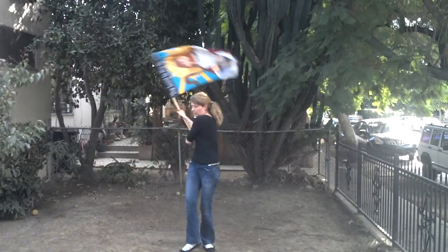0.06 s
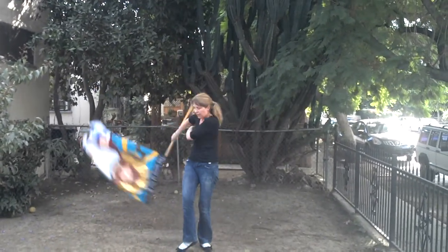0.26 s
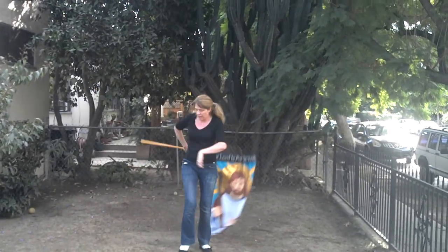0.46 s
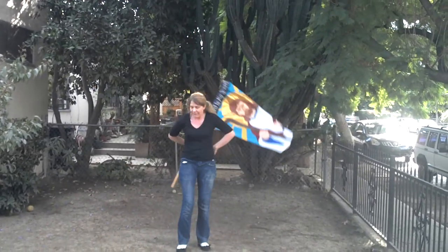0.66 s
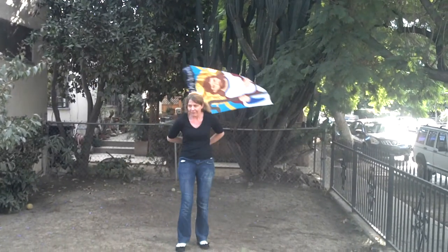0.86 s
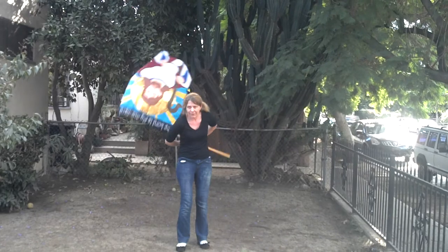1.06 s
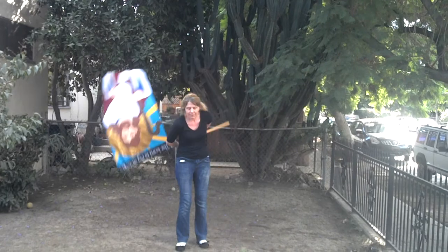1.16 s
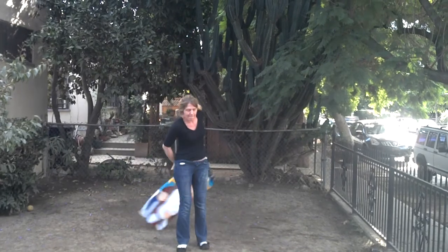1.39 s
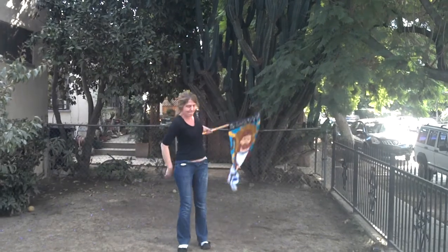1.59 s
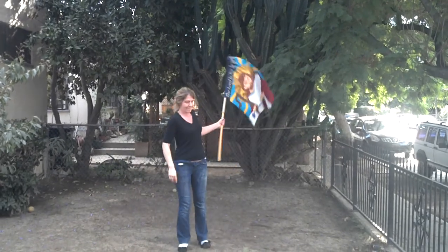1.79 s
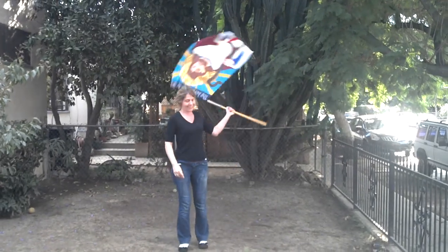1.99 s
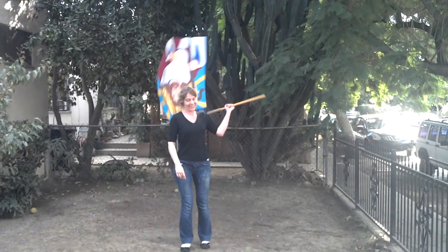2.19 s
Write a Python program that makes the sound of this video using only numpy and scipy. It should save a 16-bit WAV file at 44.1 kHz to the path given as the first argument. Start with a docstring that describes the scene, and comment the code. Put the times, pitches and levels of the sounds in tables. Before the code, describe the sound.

Big fabric flag twirled in a yard, one loud flapping burst, then a weaker one, sparse bird chirps

```python
"""Far traffic, shaped noise, rumbles throughout a yard; gliding whistles make sparrow-like birds chirp here and there.
Someone twirls a large cloth flag on a pole: first the air (fluttering noise) rushes and the cloth (tiny grains)
rustles, then about a third of a second in the sheet flaps, knocks and snaps hard (pushes through resonances).
After a quieter stretch a weaker bout of flaps and snaps comes near 1.4 s, then a flurry of chirps near 2.1 s.
A small camera hears all this with two capsules and widens the stereo with a short delay comb."""
import sys
import numpy as np
from scipy import signal
from scipy.fft import rfft, irfft, next_fast_len
from scipy.io import wavfile

SR = 44100
rng = np.random.default_rng(int(sys.argv[2]) if len(sys.argv) > 2 else 0)


def generate_wav(sig):
    """Save sig (samples, or channels by samples) to the path in sys.argv[1] as 16-bit PCM at SR."""
    pcm = np.round(np.clip(np.atleast_2d(sig).T, -1, 1) * 32767).astype(np.int16)
    wavfile.write(sys.argv[1], SR, pcm)


def magnitude_from_level(level_db):
    """Linear magnitude for a level in decibels (20 dB per decade)."""
    exponent = np.asarray(level_db, float) / 20
    return 10 ** exponent


N = 99225  # length in samples: 2.25 s


def rms_one(x):
    """Scale to unit rms."""
    return x / np.sqrt(np.mean(x ** 2) + 1e-20)


def in_time(rows):
    """Draw straight lines between (time [s], value) points, giving a value at every sample."""
    return np.interp(np.arange(N) / SR, *np.transpose(rows))


def through(x, response):
    """Filter by a response given as a function of Hz."""
    size = next_fast_len(N + 4096)
    hz = np.arange(size // 2 + 1) * SR / size + 1e-3
    return irfft(rfft(x, size) * response(hz), size)[..., :N]


def on_log(points):
    """Turn a (frequency [Hz], value) table into a function of Hz, with straight lines over log frequency."""
    table_hz, values = np.transpose(points)
    return lambda hz: np.interp(np.log(hz), np.log(table_hz), values)


def colour(x, spectrum):
    """Shape the spectrum by a (frequency [Hz], level [dB]) table."""
    return through(x, lambda hz: magnitude_from_level(on_log(spectrum)(hz)))


def drift(rate_hz):
    """Wander by chance at up to about rate_hz, with unit rms: white noise smoothed by two equal poles."""
    pole = np.exp(-2 * np.pi * rate_hz / SR)
    smooth = signal.lfilter([1], [1, -2 * pole, pole * pole], rng.standard_normal(N + SR))
    return rms_one(smooth[SR:])  # skip the first second, where the filter settles


def bursts(rows, width, rough):
    """Send a push and dying turbulence through a resonance, scaled to its peak; one draw per capsule.

    width is the band's reach over its centre; rough is the strength of the turbulence after the push."""
    out = np.zeros((2, N + SR))
    t = np.arange(SR // 8) / SR
    for start, db, hz, t60 in rows:
        turbulence = rng.standard_normal((2, len(t))) * magnitude_from_level(-60 * t / t60)
        drive = rough * np.sqrt(hz / SR) * 4 * turbulence
        drive[:, 0] += 1  # the push
        edges = [hz / (1 + width), min(hz * (1 + width), .45 * SR)]
        sound = signal.sosfilt(signal.butter(2, edges, "band", fs=SR, output="sos"), drive)
        i = int(start * SR)
        out[:, i:i + len(t)] += magnitude_from_level(db) * sound / abs(sound).max(axis=1, keepdims=True)
    return out[:, :N]


# colour of the far street: (frequency [Hz], relative level [dB])
TRAFFIC_SPECTRUM = [(40, -42), (60, -5), (90, -3), (130, 3), (300, 2.5), (450, -1), (900, -2.5),
                    (1300, -17.5), (2000, -41), (3000, -32), (5500, -46), (7000, -29), (10000, -39),
                    (12000, -32), (15000, -37)]


def traffic():
    """A steady far rumble: shaped noise that swells a little, both slowly and faster."""
    level_db, swell_db = -49.5, 3
    swell = swell_db * (drift(0.88) + 0.42 * drift(22.0))
    rumble = rms_one(colour(rng.standard_normal((2, N)), TRAFFIC_SPECTRUM))
    return rumble * magnitude_from_level(level_db + swell)


# bird notes, before rasp and echo: (start time [s], length [s], level [dB], from [Hz], to [Hz])
BIRD_NOTES = [(0.106, 0.025, -55.5, 5020, 4160), (0.111, 0.031, -60, 4070, 3890),
              (0.594, 0.13, -70, 4000, 3940), (0.753, 0.03, -57, 3790, 3550),
              (0.806, 0.017, -55, 3560, 3690), (1.484, 0.024, -57.5, 3355, 3670),
              (2.103, 0.019, -60.5, 4370, 4400), (2.122, 0.031, -54.5, 4700, 3925),
              (2.151, 0.0252, -58.5, 4610, 3940), (2.166, 0.047, -60.5, 3270, 4000),
              (2.18, 0.033, -59, 4540, 4050), (2.193, 0.012, -55, 3990, 4030),
              (2.196, 0.037, -60, 3560, 3440)]


def birds():
    """Gliding whistles, wavering in pitch and rasping in level, with a short scattered echo off the trees."""
    waver_share, rasp_db = .013, 5
    echo_t60_s, echo_db = 0.34, -3
    notes = np.zeros(N + SR)
    waver = 1 + waver_share * drift(174.0)
    for start, length, db, from_hz, to_hz in BIRD_NOTES:
        u = np.linspace(0, 1, int(length * SR))  # progress through the note
        i = int(start * SR)
        hz = (from_hz + (to_hz - from_hz) * u) * np.resize(waver[i:], len(u))
        swell = np.sqrt(2 * np.sin(np.pi * u) + 1e-9)
        notes[i:i + len(u)] += magnitude_from_level(db) * swell * np.sin(2 * np.pi * np.cumsum(hz) / SR)
    notes = notes[:N] * magnitude_from_level(rasp_db * drift(240.0))
    t = np.arange(SR // 4) / SR
    scatter = rng.standard_normal((2, len(t))) * magnitude_from_level(-60 * t / echo_t60_s)
    echo = magnitude_from_level(echo_db) * rms_one(scatter) / np.sqrt(len(t))
    return notes + signal.fftconvolve(notes[None], echo, axes=1)[:, :N]


# strength of the air rush, before its flutter: (time [s], level [dB])
RUSH_LEVEL = [(0, -39.5), (.05, -46.5), (.15, -51), (.2, -42.5), (.25, -35.5), (.28, -41), (.32, -33.5),
              (.35, -28), (.39, -33.5), (.425, -38), (.452, -28), (.47, -39.5), (.495, -30), (.52, -33.5),
              (.55, -34.5), (.585, -45), (.72, -46), (.85, -50.5), (1.33, -50), (1.4, -44.5),
              (1.438, -38.5), (1.465, -45), (1.51, -42.5), (1.55, -51), (1.62, -47), (1.8, -49),
              (2.25, -51)]
# colour of the air rush: (frequency [Hz], relative level [dB])
RUSH_SPECTRUM = [(50, -44), (90, -10), (160, -4), (300, 1.5), (450, -6), (700, -0.5), (1200, -3.5),
                 (2000, -7.5), (2400, -13.5), (3200, -22.5), (6000, -47)]


def air_rush():
    """Air rushing over the cloth: shaped noise following the twirl, with a fast random flutter in level."""
    flutter_db, flutter_hz = 1.5, 110
    rush = rms_one(colour(rng.standard_normal((2, N)), RUSH_SPECTRUM))
    return rush * magnitude_from_level(in_time(RUSH_LEVEL) + flutter_db * drift(flutter_hz))


# strength of the rubbing and crinkling, before its patchiness: (time [s], level [dB])
RUSTLE_LEVEL = [(0.0, -49.5), (0.04, -59.5), (0.17, -56.5), (0.19, -43.5), (0.21, -52.5), (0.27, -40.5),
                (0.31, -49), (0.33, -36.5), (0.34, -41), (0.43, -46.5), (0.44, -44.5), (0.497, -45.5),
                (0.499, -38), (0.53, -36), (0.64, -56), (0.81, -52), (0.92, -61.5), (1.27, -62.5),
                (1.42, -55.5), (1.45, -51), (1.512, -55), (1.516, -48), (1.61, -59.5), (1.72, -62),
                (1.72, -53), (1.77, -57), (1.9, -63.5), (2.25, -62.5)]
# colour of the crinkle grains: (frequency [Hz], relative level [dB])
CRINKLE_SPECTRUM = [(1500, 4), (3000, 5.5), (4500, 3.5), (7000, 1.5), (8500, -0.5), (10000, -9.5),
                    (11500, -20.5), (15000, -24)]


def cloth_rustle():
    """Cloth rubbing and crinkling: a dense rain of tiny clicks of random sign and size, coloured."""
    grains_per_s, grain_spread_db, patchy_db = 5000, 2.5, 0.5
    grains = (rng.random((2, N)) < grains_per_s / SR) * rng.choice([-1, 1], (2, N))
    grains = grains * magnitude_from_level(grain_spread_db * np.minimum(rng.exponential(1, (2, N)), 5))
    rustle = rms_one(colour(grains, CRINKLE_SPECTRUM))
    return rustle * magnitude_from_level(in_time(RUSTLE_LEVEL) + patchy_db * drift(68.0))


# flaps, peak before the treble cut:
# (time [s], peak level [dB], centre [Hz], time for the wobble's turbulence to fall 60 dB [s])
SHEET_FLAPS = [(.179, -29.5, 690, 0.032), (.189, -31.5, 720, 0.19), (.257, -26, 567, 0.036),
               (.296, -21.5, 900, 0.04), (.3305, -15.5, 1110, 0.012), (.3275, -15, 720, 0.084),
               (.432, -21.5, 1010, 0.082), (.4415, -15, 1200, 0.057), (.4773, -8, 656, 0.0032),
               (.485, -34, 890, 0.014), (.498, -23, 1100, 0.033), (.5115, -19.5, 1020, 0.016),
               (1.370, -31.5, 640, 0.015), (1.407, -27, 920, 0.0087), (1.43, -29.5, 1000, 0.15),
               (1.4445, -20.5, 1060, 0.013), (1.502, -31.5, 1050, 0.021), (1.559, -24.5, 1110, 0.018),
               (1.729, -28.5, 900, 0.013)]


def sheet_flaps():
    """The sheet flaps: a push of air that wobbles on, in a wide band."""
    top_hz = 2400  # cloth is too soft for more treble
    soften = signal.butter(4, top_hz, fs=SR, output="sos")
    return signal.sosfilt(soften, bursts(SHEET_FLAPS, width=1, rough=0.54))


# knocks: (time [s], peak level [dB], pitch [Hz], time for the turbulence to fall 60 dB [s])
BELLY_THUMPS = [(.3295, -15, 670, 0.068), (.336, -14, 976, 0.025), (.4415, -18.5, 1750, 0.078),
                (.442, -20.5, 954, 0.049), (.4775, -22, 376, 0.052), (.499, -25.5, 367, 0.015),
                (.509, -20, 333, 0.017), (.5125, -20, 820, 0.046), (1.370, -36.5, 351, 0.015),
                (1.445, -28.5, 395, 0.015), (1.559, -28.5, 353, 0.055)]


def belly_thumps():
    """A hollow belly of the sheet pulls taut and knocks at its own pitch: a narrow resonance, mostly push."""
    return bursts(BELLY_THUMPS, width=.14, rough=0.15)


# cracks of the hem: (time [s], peak level [dB], centre [Hz], time for the turbulence to fall 60 dB [s])
HEM_SNAPS = [(.094, -44, 5400, .03), (.187, -32.5, 6400, 0.034), (.329, -36, 4750, 0.048),
             (.386, -37, 7360, .04), (.432, -33, 6900, 0.065), (.445, -25, 6770, 0.073),
             (.463, -33, 6000, 0.0087), (.4985, -28.5, 6760, 0.013), (.4985, -37, 4270, 0.017),
             (.4985, -37, 9100, .01), (.511, -44, 4150, .015), (.518, -28, 6500, 0.011),
             (1.16, -51, 5930, 0.032), (1.370, -39, 4450, 0.03), (1.430, -37, 6240, 0.027),
             (1.446, -35, 5600, 0.021), (1.5155, -47, 6600, 0.011), (1.528, -41, 8900, 0.0092),
             (1.721, -42, 6000, 0.11), (2.089, -48, 4000, 0.02)]


def hem_snaps():
    """The hem cracks: a push with strong dying turbulence in a high band."""
    return bursts(HEM_SNAPS, width=.24, rough=0.98)


def flag():
    """The whole flag: moving air, rubbing cloth, and the sheet and hem being jerked."""
    return air_rush() + cloth_rustle() + sheet_flaps() + belly_thumps() + hem_snaps()


# how alike the two capsules hear: (frequency [Hz], likeness [0-1])
CAPSULE_LIKENESS = [(100, 0.29), (400, 0.21), (700, 0.7), (1100, 0.51), (2000, 0.32), (4000, 0.42),
                    (7500, 0.87), (10000, 0.71)]
# phase of the second capsule against the first: (frequency [Hz], phase [radians])
CAPSULE_PHASE = [(1200, 0), (1500, -8.5), (2400, 0.3), (2900, -0.07)]


def capsules(pair, second_spectrum):
    """The second capsule hears a partly unlike, recoloured version of what the first hears."""
    def alike(hz):
        return np.clip(on_log(CAPSULE_LIKENESS)(hz), 0, 1)

    shared = through(pair[0], lambda hz: alike(hz) * np.exp(1j * on_log(CAPSULE_PHASE)(hz)))
    separate = through(pair[1], lambda hz: np.sqrt(1 - alike(hz) ** 2))
    return np.array([pair[0], colour(shared + separate, second_spectrum)])


# second capsule against the first, for the far street: (frequency [Hz], level [dB])
SECOND_CAPSULE_FAR = [(60, 9), (130, -2), (300, -6.5), (450, 0.5), (900, -1), (1200, 17.5), (2300, 4),
                      (8000, -7), (11500, -3), (15000, 2)]
# second capsule against the first, for the flag and birds: (frequency [Hz], level [dB])
SECOND_CAPSULE_NEAR = [(60, -3), (130, -8), (300, -16), (650, -12), (1200, -5), (1600, -3), (2300, -6),
                       (3000, 1), (15000, 0)]


def scene():
    """What the two capsules pick up: the far street, then the birds and flag."""
    far = capsules(traffic(), SECOND_CAPSULE_FAR)
    near = capsules(birds() + flag(), SECOND_CAPSULE_NEAR)
    return far + near


def band_limit(x):
    """A steep low-pass at the top of the band."""
    return signal.sosfilt(signal.butter(12, 15670, fs=SR, output="sos"), x)


def record(dry):
    """Mid is the first capsule minus its delayed self, bass restored; side is the second plus its delayed self."""
    comb_samples, bass_lift_hz = 16.945, 826
    low_cut_hz, top_hz = 85.5, 15100

    def late(hz):
        return np.exp(-2j * np.pi * hz * comb_samples / SR)

    mid = through(dry[0], lambda hz: (1 - late(hz)) / 2 * (1 + bass_lift_hz / (1j * hz)))
    side = through(dry[1], lambda hz: -(1 + late(hz)) / 2)
    low_cut = signal.butter(3, low_cut_hz, "high", fs=SR, output="sos")
    stereo = signal.sosfilt(low_cut, [mid + side, mid - side])
    # steep end of the treble
    stereo = colour(stereo, [(top_hz, 0), (1.01 * top_hz, -8), (1.035 * top_hz, -10), (1.042 * top_hz, -60)])
    return band_limit(stereo)


dry = scene()
out = record(dry)
generate_wav(out)
```